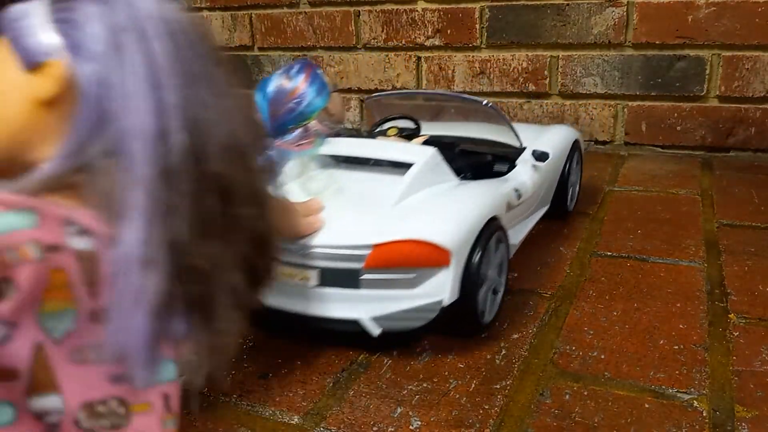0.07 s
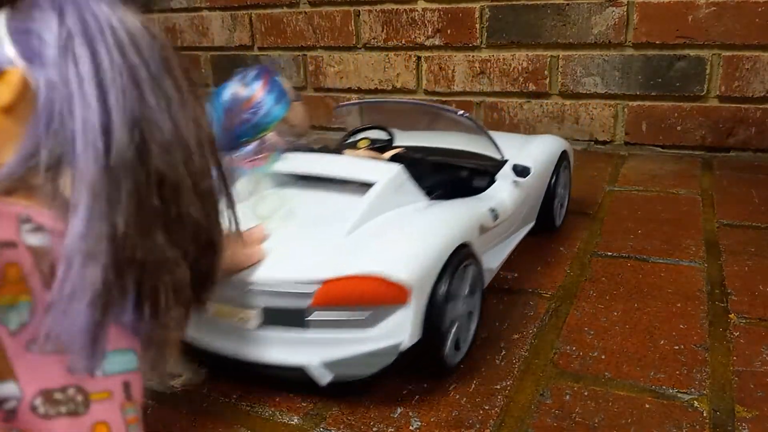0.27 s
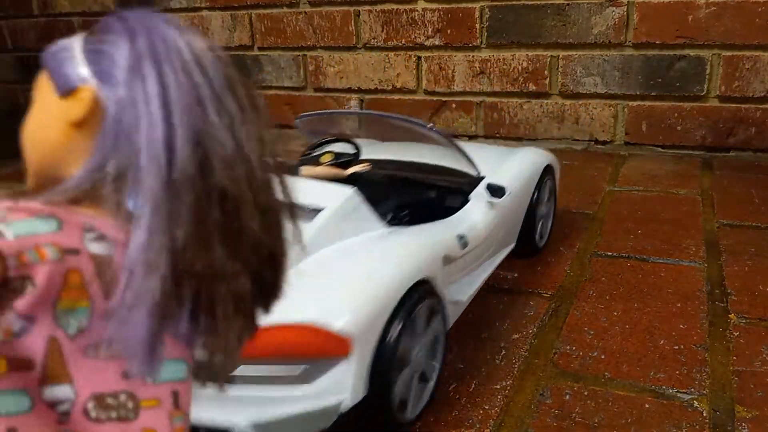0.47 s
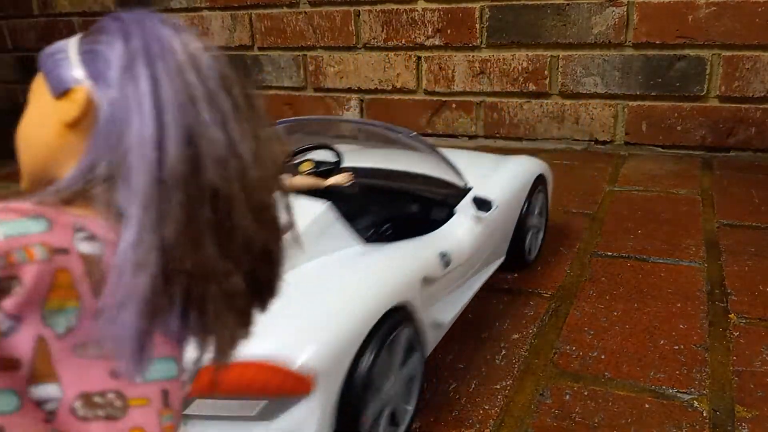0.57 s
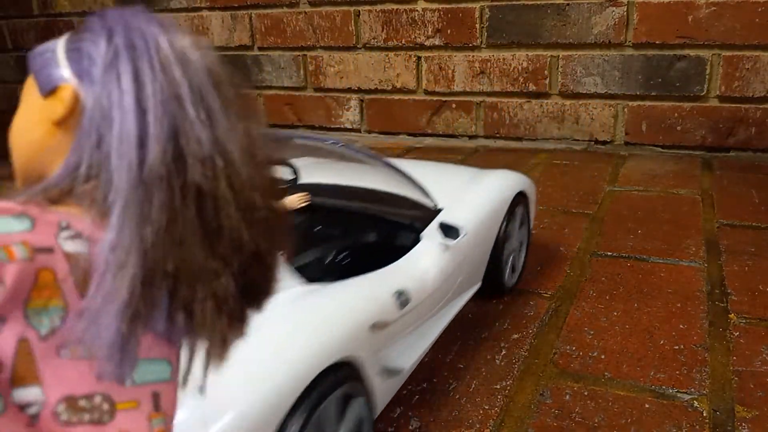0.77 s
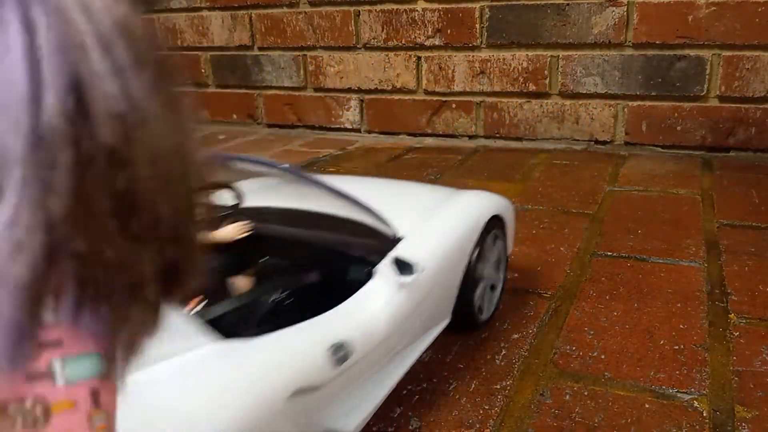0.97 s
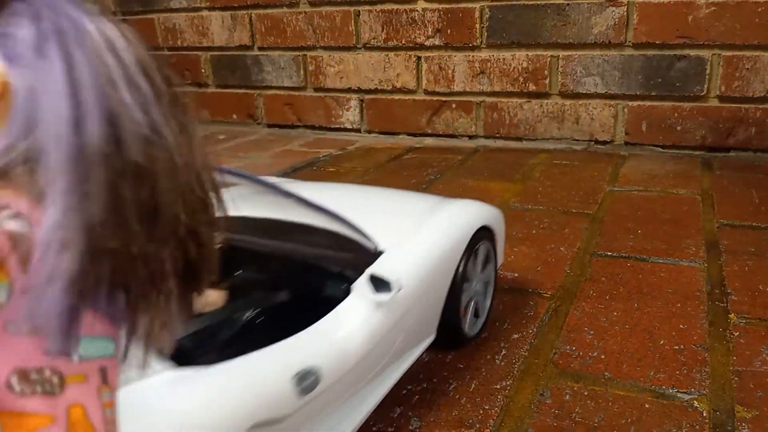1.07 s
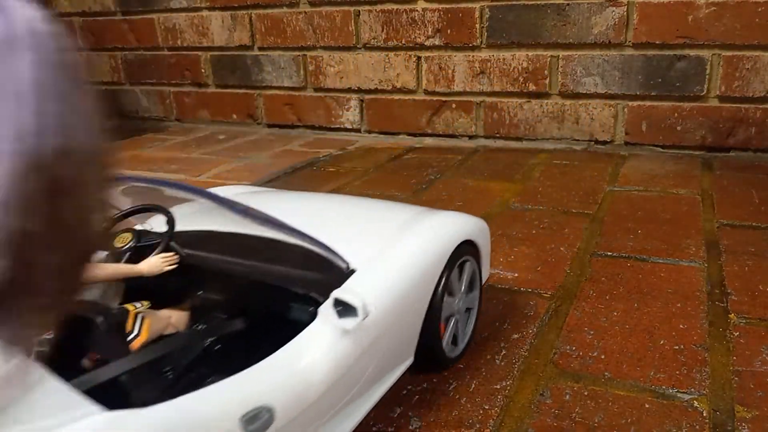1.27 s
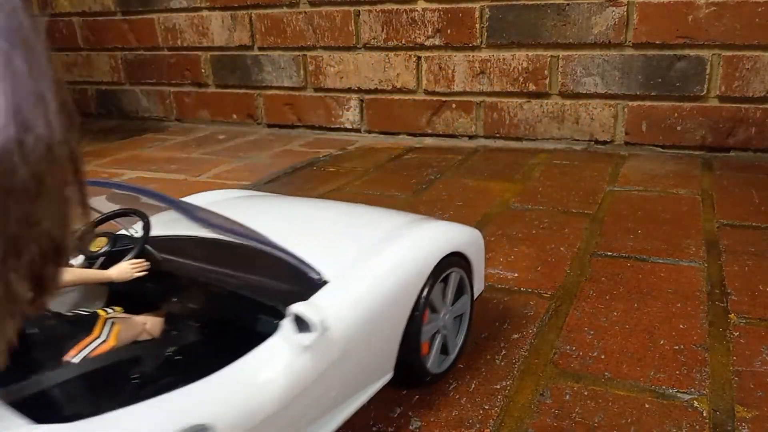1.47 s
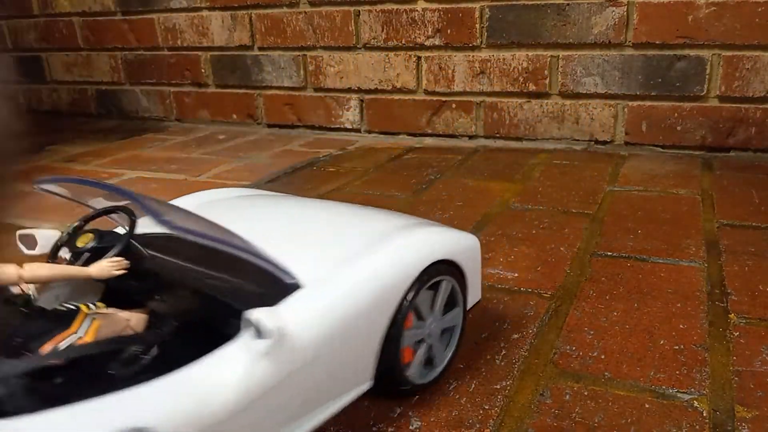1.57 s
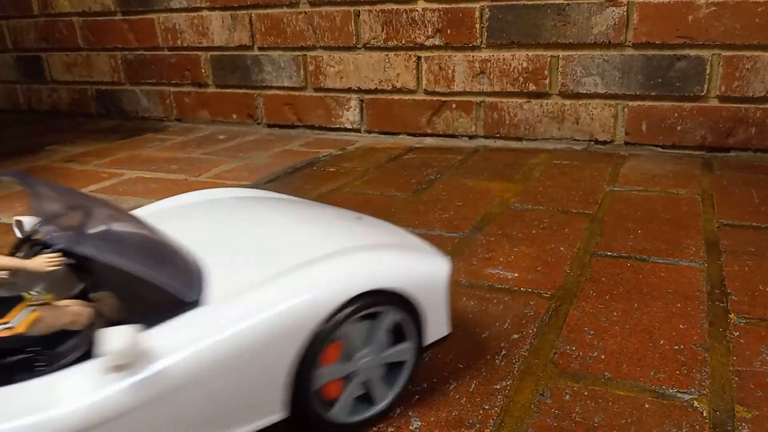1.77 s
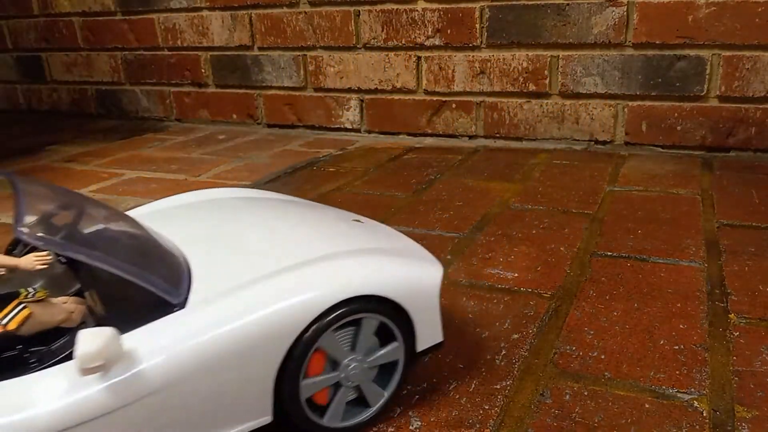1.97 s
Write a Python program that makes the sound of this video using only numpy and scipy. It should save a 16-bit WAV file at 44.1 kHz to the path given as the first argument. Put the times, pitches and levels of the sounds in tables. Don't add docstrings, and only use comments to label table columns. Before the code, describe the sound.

A hollow plastic toy car rolls over brick, heard close in stereo with short wall reflections. Rattles and a boomy thump come by 0.2 s, lighter ticking follows, then knocks cluster from 0.6 s, hardest at 0.87 and 0.93. After 1.1 s only a wavering low hum and soft wash remain. From 1.5 to 1.85 s it drags, scraping grit with hollow thumps, then quiets.

```python
import sys
import numpy as np
from scipy import signal
from scipy.fft import rfft, irfft
from scipy.io import wavfile
from scipy.ndimage import uniform_filter1d, map_coordinates

SR = 44100
rng = np.random.default_rng(int(sys.argv[2]) if len(sys.argv) > 2 else 0)


def amplitude_ratio(level_db):
    exponent = np.asarray(level_db, float) / 20
    return 10 ** exponent


def master(y):
    cut = np.clip(np.atleast_2d(y).T, -1, 1)
    pcm = np.round(cut * 32767)
    wavfile.write(sys.argv[1], SR, pcm.astype(np.int16))


N = 88905
T = np.arange(N) / SR
BLOW_T = T[:6000]
CONTACT_S = 0.0011


def evened(x):
    return x / np.sqrt(np.mean(x ** 2) + 1e-20)


def read(points, hz):
    f, value = np.transpose(points)
    return np.interp(np.log(hz + 1), np.log(f + 1), value)


def curve(points):
    return np.interp(T, *np.transpose(points))


def colour(x, points):
    gain = amplitude_ratio(read(points, np.fft.rfftfreq(x.shape[-1], 1 / SR)))
    return irfft(rfft(x) * gain, x.shape[-1])


def add(mix, s, sound):
    part = mix[:, round(s * SR):][:, :sound.shape[-1]]
    part += sound[..., :part.shape[-1]]


def correlated(a, b, same):
    return np.array([a, same * a + np.sqrt(1 - same ** 2) * b])


def specks(per_s, spread_db):
    struck = rng.random(N) < per_s / SR
    size = rng.exponential(1, N)
    sign = rng.choice([-1., 1.], N)
    return sign * amplitude_ratio(spread_db * np.minimum(size, 4)) * struck


def ring(modes, detune=1, contact=np.ones(1)):
    hz, db, t60 = np.transpose(modes)[:, :, None]
    free = amplitude_ratio(-60 * BLOW_T / t60) * np.sin(2 * np.pi * hz * detune * BLOW_T)
    each = signal.oaconvolve(free, contact[None], axes=1)[:, :len(BLOW_T)]
    x = (amplitude_ratio(db) * each / abs(each).max(1, keepdims=True)).sum(0)
    return x / abs(x).max()


def cavity_boom(hz, t60, rise_s):
    modes = [(hz, 0, t60), (hz * 1.357, -8.5, t60)]
    return ring(modes) * (1 - np.exp(-(BLOW_T / rise_s) ** 2))


# f/Hz, level/dB
CRACK = [(880, 23.5), (1500, 8), (2090, 7), (3170, -11.5), (3700, -8.5), (8130, -43.5), (15700, -105)]


def crack_noise(fall, tilt_db):
    n = len(BLOW_T)
    tone = [(hz, level + (9 + tilt_db) * np.log2(hz / 3000)) for hz, level in CRACK]
    noise = correlated(rng.standard_normal(n), rng.standard_normal(n), 0.067)
    crack = evened(colour(noise, tone))
    flutter = amplitude_ratio(3.5 * evened(uniform_filter1d(rng.standard_normal(n), size=70)))
    tail = amplitude_ratio(-1 - 60 * BLOW_T / 0.031)
    crack = crack * (1 - np.exp(-BLOW_T / CONTACT_S)) * flutter * (fall + tail)
    band = signal.butter(3, [600, 7500], "band", fs=SR, output="sos")
    return signal.sosfilt(band, crack)


def knock(mix, s, db, boom_db, crack_db, boom_hz, modes, lag_s, chatter_s, tilt_db=0):
    detune = 1 + 0.019 * rng.uniform(-0.71, 1, (10, 1))[:len(modes)]
    rise, fall = 1 - np.exp(-BLOW_T / CONTACT_S), np.exp(-BLOW_T / chatter_s)
    soft = signal.butter(3, 2600, fs=SR, output="sos")
    force = signal.sosfilt(soft, rng.standard_normal(len(BLOW_T)) * rise * fall)
    shell = ring(modes, detune, force)
    crack = crack_noise(fall, tilt_db)
    if lag_s:
        boom_hz = boom_hz * detune[-1, 0] ** 2
    boom = cavity_boom(boom_hz, t60=0.051, rise_s=0.0029)
    add(mix, s, amplitude_ratio(db) * (amplitude_ratio(-2) * shell + amplitude_ratio(crack_db + 3) * crack))
    add(mix, s + abs(lag_s), amplitude_ratio(db + boom_db + 6.5) * boom)


CHATTER_S = [0.0024, 0.0036, 0.003]
# t/s, shell level/dB, boom re shell/dB, crack re shell/dB, boom f/Hz
DROPS = [
    (0.109, -26.5, 6.5, -8, 292),
    (0.57, -36.5, 10, -18, 300),
    (0.626, -24, 0, -21, 275),
    (0.701, -23.5, 5.5, -16, 296),
    (0.866, -17, 4.5, -15, 278),
    (0.93, -17, -0.5, -16.5, 276.3),
    (1.091, -28.5, 6.5, -17, 288),
    (1.638, -22, -23, -9, 320),
]
BRIGHT_DROPS = [1, -1, -1, -1, 0.77, -0.75, -0.3, -0.058]
# f/Hz, level/dB, t60/s
WHEEL = [(695, -2, .03), (885, -7, .035), (1060, -6, .025), (1960, 0, .014), (2490, -16, .01),
         (3700, -26, .012)]


def joint_drops(mix):
    for row, tilt_db in zip(DROPS, BRIGHT_DROPS):
        knock(mix, *row, WHEEL, 0, CHATTER_S[0], tilt_db)


# t/s, shell level/dB, boom re shell/dB, crack re shell/dB
RATTLES = [(0.0, -27.5, 0.5, -10), (0.014, -38.5, 4, -4), (0.131, -18, -7, -14), (0.149, -25, -8.5, -14),
           (0.159, -41, 17, 4), (0.17, -31, -21, -5), (0.1955, -31, -24, -4.5), (0.218, -28, 4, -17),
           (0.2512, -37.5, -5, -8.5), (0.263, -40, -7, -9.5), (0.311, -33.5, 6.5, -7.5),
           (0.358, -33, 6.5, -47), (0.383, -28, -9, -56), (0.414, -39.5, -16, -13), (0.432, -29.5, -5, -15),
           (0.466, -28.5, -8, -14.5), (0.561, -55, -7, -12), (0.605, -33.5, 4, -15),
           (0.645, -20, -11, -21.5), (0.661, -30, -6, -13), (0.715, -28, -6, -6.5), (0.732, -49, -17, -26),
           (0.892, -38, 9.5, -1.5), (0.908, -39, 4, -16), (0.966, -35, 1, -5), (0.98, -57, 1, -1),
           (0.999, -50, 12, -15), (1.0535, -35, -15, -6), (0.65, -34.5, -17, -4), (0.88, -30, -5, 1)]
BRIGHT_RATTLES = [3, 3.5, 5.2, 4, -1, 3.5, 4, 2.5, 4, 0.5, 1, -1, -1, -1, -1.2, 1.1, 4, -3, 6.8, 4, -0.9,
                  -3, 4, 7, -10, 3.5, 9, -1, -1, -7]
# f/Hz, level/dB, t60/s
AXLE = [(717, 4, 0.014), (861, -4.5, 0.04), (1253, 1.5, 0.01), (1953, -5.5, 0.024), (2603, -11.5, 0.025),
        (4540, -27, 0.025)]


def axle_rattles(mix):
    for row, tilt_db in zip(RATTLES, BRIGHT_RATTLES):
        knock(mix, *row, 357, AXLE, 0.00256, CHATTER_S[1], tilt_db)


# t/s, shell level/dB, boom re shell/dB, crack re shell/dB
CATCHES = [(1.48, -35.5, -6.5, -28), (1.512, -29.5, -2.5, -29), (1.524, -33.5, 1, -25),
           (1.542, -48, -4, -15), (1.557, -31.5, 1, -21), (1.612, -37, 0, -39), (1.666, -24, 2, -19),
           (1.7, -31.5, -0.5, -8), (1.763, -37, -19, -15), (1.788, -34, -18, -33), (1.808, -35, 5.5, -6.5),
           (1.843, -28, -25, -26), (1.876, -45, -26, -10), (2.001, -41, -9, -41)]
PART_HZ = [3800, 1250, 1060, 7000, 870, 1750, 700, 2540, 2920, 710, 2970, 790, 653, 785]


def drag_catches(mix):
    for row, part_hz in zip(CATCHES, PART_HZ):
        knock(mix, *row, 314, AXLE[:3] + [(part_hz, 4.5, 16 / part_hz)], 0, CHATTER_S[2])


# t/s, level/dB, tilt at 15 kHz/dB
TICKS = [(0.1088, -45.5, -14), (0.132, -47, -14), (0.2864, -55, 2), (0.6243, -52, -11), (0.644, -47, -13),
         (0.866, -32, -14), (0.9792, -49, -5.5), (1.053, -48, -19), (1.09, -60, -12), (1.48, -53.5, -13),
         (1.5414, -51, -10), (1.639, -38.5, -6), (1.6714, -55, -2.5), (1.6934, -55, -13), (1.7, -42, -17),
         (1.7893, -43, 1), (1.8058, -49, -16)]


def bright_ticks(mix):
    envelope = (1 - np.exp(-BLOW_T / CONTACT_S)) * np.exp(-BLOW_T / 0.0019)
    for s, db, tilt_db in TICKS:
        tone = [(3050, -30), (6100, 0), (15000, tilt_db)]
        snap = evened(colour(rng.standard_normal((2, len(BLOW_T))), tone))
        add(mix, s, amplitude_ratio(db + 3.5) * snap * envelope)


# t/s, level/dB, f/Hz
THUMPS = [(0.166, -27.5, 323), (.179, -17, 339), (0.2, -22, 324), (.225, -27, 322), (0.746, -36.5, 197),
          (1.552, -22, 302), (1.633, -13.5, 324), (1.657, -21, 307), (1.68, -21, 308), (1.747, -34, 248),
          (1.762, -20.5, 238), (1.778, -24.5, 304), (1.795, -33, 332), (1.827, -27.5, 292),
          (1.844, -21.5, 303)]


def body_thumps(mix):
    for s, db, hz in THUMPS:
        add(mix, s, amplitude_ratio(db + 6.5) * cavity_boom(hz, t60=0.039, rise_s=0.0031))


# t/s, level/dB, f/Hz, t60/s
PINGS = [
    (.132, -33, 1250, 0.03),
    (1.699, -32, 2670, 0.0092),
    (2.0, -46, 735, 0.046),
    (0.472, -52, 1370, 0.034),
    (.572, -36.5, 870, 0.059),
    (.646, -38, 1328, 0.07),
    (.717, -60, 2030, 0.032),
    (1.055, -35.5, 556, 0.04),
    (1.634, -31, 885, 0.063),
    (1.639, -28, 2107, 0.01),
]


def part_pings(mix):
    for s, db, hz, t60 in PINGS:
        jolt = rng.standard_normal(200) * np.hanning(200) ** 2
        tuned = np.hanning(100) * np.cos(2 * np.pi * hz * T[:100])
        add(mix, s, amplitude_ratio(db) * ring([(hz, 0, t60)], contact=np.convolve(jolt, tuned)))


def grit(tone):
    grains = correlated(specks(2500, 5.5), specks(2500, 5.5), 0.3)
    return evened(colour(grains, tone))


def shaken(modes):
    total = np.zeros(N)
    for hz, db, t60 in modes:
        bumps = specks(300, 3.5)
        total += amplitude_ratio(db) * signal.oaconvolve(bumps, ring([(hz, 0, t60 * 0.82)]))[:N]
    return evened(total)


# t/s, level/dB
ROLL = [(0, -42.5), (.08, -52.5), (.2, -39.5), (.3, -50), (.5, -52.5), (.65, -48), (.8, -62), (.95, -48.5),
        (1.1, -48.5), (1.25, -68), (1.44, -57.5), (1.55, -42), (1.66, -39.5), (1.74, -38.5), (1.83, -38),
        (1.89, -69), (2.02, -73)]
# f/Hz, level/dB, t60/s
BODY = [(234.5, -7, 0.1), (320, 1.5, 0.097), (340.6, 6, 0.058), (378, -3, 0.013), (575, -6.5, 0.0055)]


def rolling():
    rumble = shaken(BODY) + amplitude_ratio(-13) * shaken(AXLE)
    return amplitude_ratio(curve(ROLL) + 2.5) * (rumble + amplitude_ratio(-16.5) * grit(CRACK))


# t/s, level/dB
DRAG = [(1.43, -88), (1.48, -61.5), (1.6, -56.5), (1.65, -50.5), (1.74, -56.5), (1.8, -52), (1.86, -65.5),
        (1.92, -74)]
# f/Hz, level/dB
GRIT = [(800, -13), (1300, -8), (2000, -21), (3000, -18.5), (5000, -22), (8000, -27), (11000, -26.5),
        (15700, -28.5)]


def scrape():
    return amplitude_ratio(curve(DRAG)) * grit(GRIT)


# f/Hz, t60/s
WALL = [(250, 0.17), (1000, 0.16), (4000, 0.16), (12000, 0.2)]
# f/Hz, coherence/1
WALL_SAME = [(200, 0.68), (700, .6), (2000, 0.067)]


def wall(x):
    taps = np.zeros((2, SR // 2))
    at = np.arange(60, SR // 2 - 20, 20)
    at = at + rng.integers(0, 20, (2, len(at)))
    np.put_along_axis(taps, at, rng.choice([-1., 1.], at.shape), 1)
    hz, t, z = signal.stft(taps, SR, nperseg=256)
    z = correlated(z[0], z[1], np.clip(read(WALL_SAME, hz), 0, 1)[:, None])
    decay = amplitude_ratio(-60 * t / read(WALL, hz)[:, None])
    tail = signal.istft(z * decay, SR, nperseg=256)[1]
    return signal.fftconvolve(x[None], tail / np.linalg.norm(tail[0]), axes=1)[:, :N]


# t/s, level/dB
HUM = [(0, -48.5), (.2, -44.5), (.26, -64), (.3, -38), (.34, -72), (.39, -37), (.43, -52.5), (.47, -43),
       (.67, -44), (1.0, -46), (1.05, -41), (1.13, -48), (1.23, -41), (1.26, -66), (1.37, -44.5),
       (1.8, -43.5), (2.02, -52)]
# multiple of the fundamental/1, level/dB
HUM_PARTIALS = [(0.599, -8.5), (2.001, -13), (2.5, -21)]


def hum():
    drift = evened(uniform_filter1d(rng.standard_normal((4, N)), size=3000, axis=1))
    wander_hz = np.array([[3.0], [12], [4], [4]]) * drift
    turns = 2 * np.pi * np.cumsum(122.14 + wander_hz, axis=1) / SR
    rest = np.zeros(N)
    for k, (multiple, db) in enumerate(HUM_PARTIALS):
        rest += amplitude_ratio(db + 0.7 * drift[-1 - k]) * np.sin(multiple * turns[k + 1])
    return np.sqrt(2) * (amplitude_ratio(curve(HUM)) * np.sin(turns[0]) + amplitude_ratio(-45.5) * rest)


# f/Hz, level/dB
YARD = [(50, -16), (105, -6.5), (200, -19.5), (300, -19), (520, -39), (2500, -57.5), (6000, -60),
        (11000, -56), (15700, -63)]
# f/Hz, coherence/1
SAME = [(60, 0.88), (240, 0.73), (950, 0.22), (3770, 0.03), (15000, 0.04)]


def yard():
    frames, hz = N // 256 + 5, np.fft.rfftfreq(1024, 1 / SR)
    a, b, c, d, patches = rng.standard_normal((frames, 513, 5)).T
    patches = uniform_filter1d(patches, size=12, axis=0)
    patches = evened(uniform_filter1d(patches, size=14, axis=1))
    z = correlated(a + 1j * b, c + 1j * d, np.clip(read(SAME, hz), -1, 1)[:, None])
    z *= amplitude_ratio(read(YARD, hz)[:, None] + 2 * patches)
    return amplitude_ratio(-46.5) * evened(signal.istft(z, nperseg=1024, noverlap=768)[1][:, :N])


# t/s, lead/s
LEAD = [(0, 0), (.9, 0), (1.2, .00018), (1.5, .0003), (2.02, .00032)]
# t/s, level/dB
PAN = [(0, 0.5), (.3, -1), (.6, -1), (.9, -1), (1.2, -2.5), (1.4, 1.5), (1.55, 0), (2.02, 1)]


def scene():
    car = np.zeros((2, N))
    for blows in (joint_drops, axle_rattles, drag_catches, bright_ticks, body_thumps, part_pings):
        blows(car)
    left, right = car + rolling() + scrape()
    late = np.arange(N) - SR * curve(LEAD)
    right = map_coordinates(right, [late], order=3, mode="nearest")
    side = amplitude_ratio(curve(PAN) / 2)
    return np.array([left * side, right / side]) + amplitude_ratio(-5) * wall(left) + yard() + hum()


# f/Hz, level/dB
LEAN = [(40, 3), (80, -7), (280, 4.5), (700, -1), (2500, 0), (12000, 3)]


def microphone_ports(dry):
    left = colour(dry[0], [(hz, db / 2) for hz, db in LEAN])
    right = colour(dry[1], [(hz, -db / 2) for hz, db in LEAN])
    edge = signal.firwin(401, 15700, window=("kaiser", 9), fs=SR)
    ports = signal.oaconvolve(np.array([left, right]), edge[None], "same")
    return signal.sosfilt(signal.butter(3, 62.6, "high", fs=SR, output="sos"), ports)


def band_limit(x):
    return signal.sosfilt(signal.butter(12, 15850, fs=SR, output="sos"), x)


def record(dry):
    mix = microphone_ports(dry)
    return band_limit(mix)


dry = scene()
out = record(dry)
master(out)
```